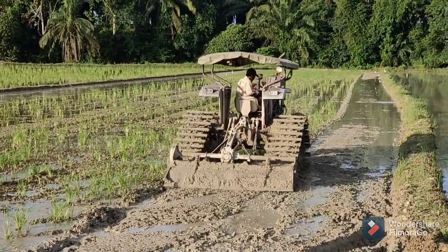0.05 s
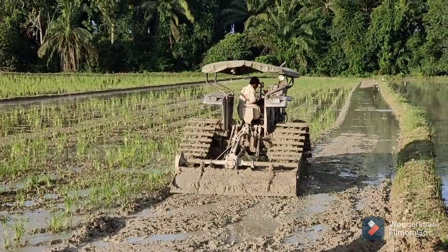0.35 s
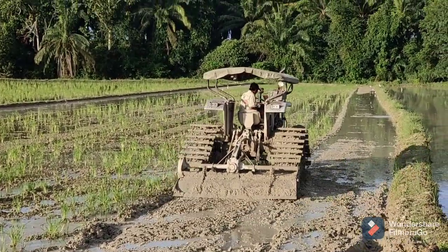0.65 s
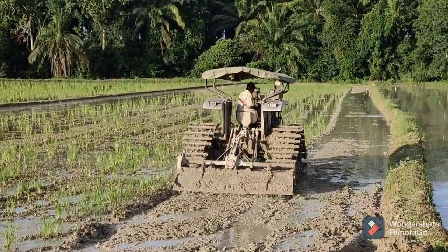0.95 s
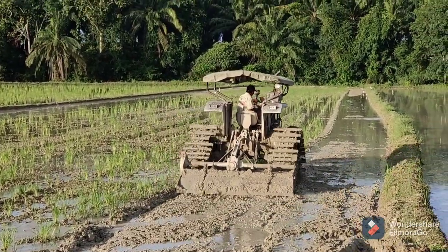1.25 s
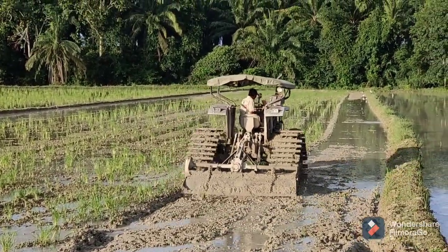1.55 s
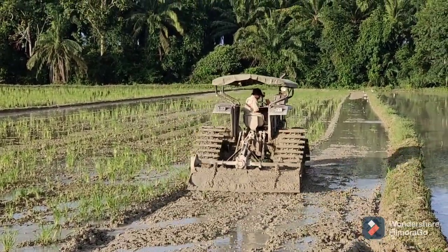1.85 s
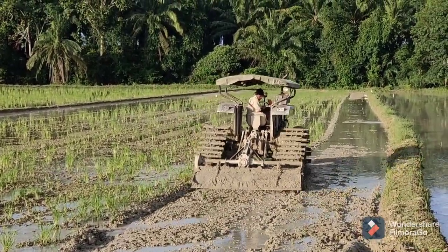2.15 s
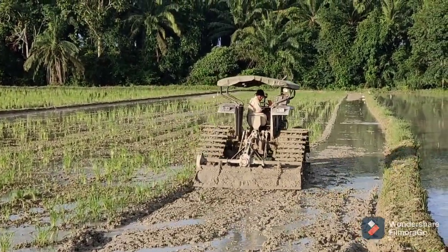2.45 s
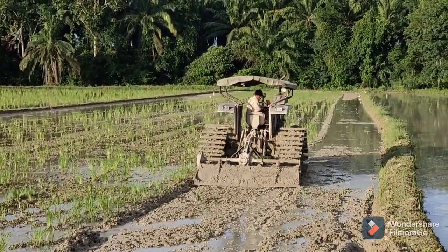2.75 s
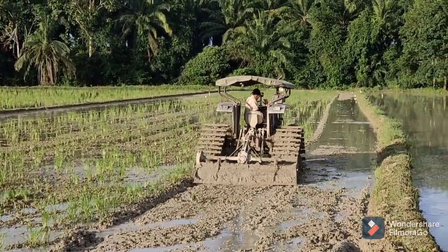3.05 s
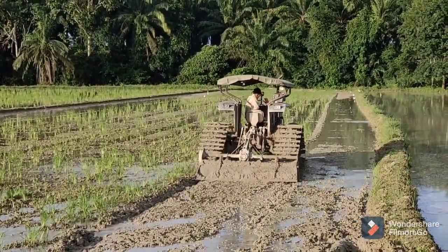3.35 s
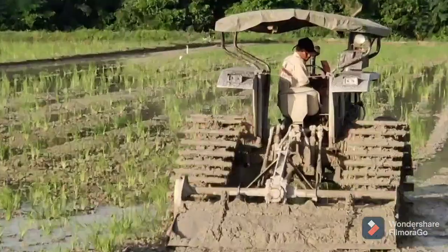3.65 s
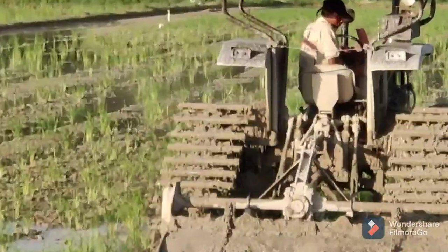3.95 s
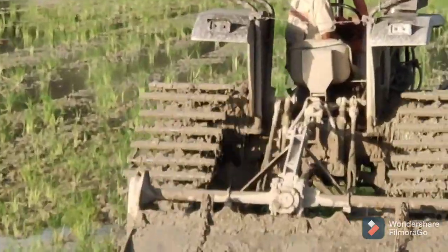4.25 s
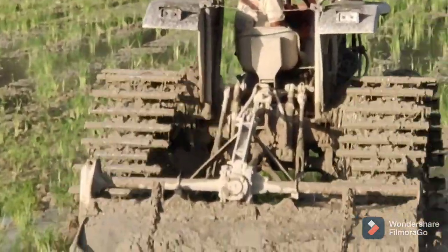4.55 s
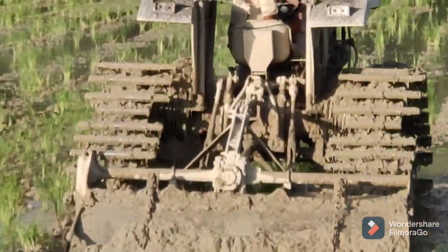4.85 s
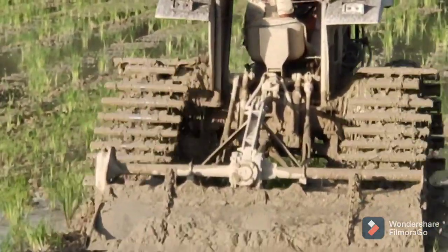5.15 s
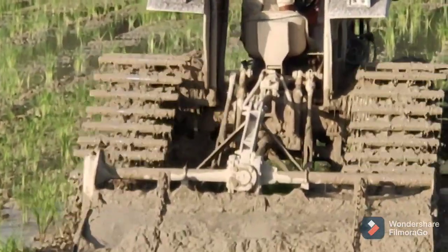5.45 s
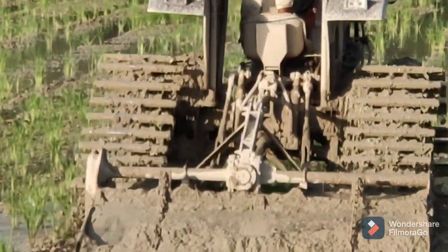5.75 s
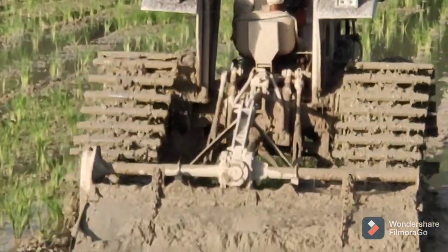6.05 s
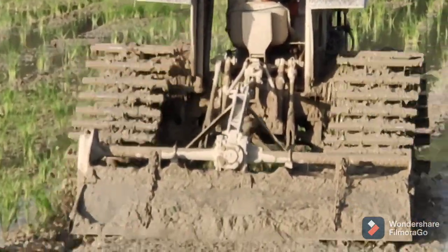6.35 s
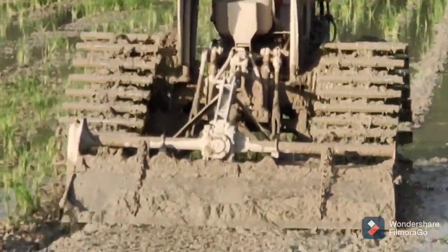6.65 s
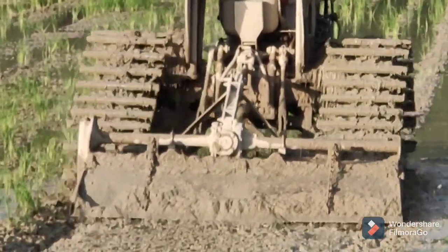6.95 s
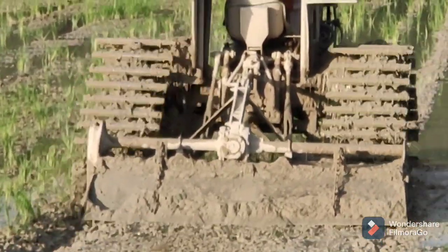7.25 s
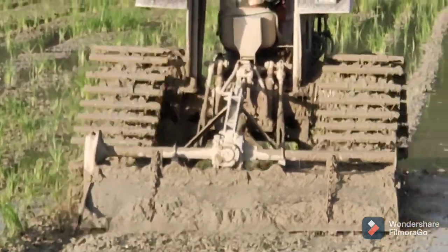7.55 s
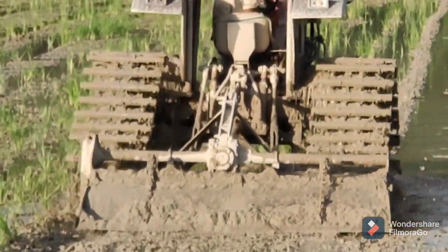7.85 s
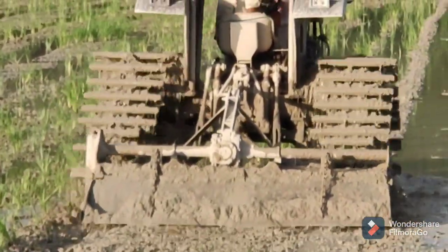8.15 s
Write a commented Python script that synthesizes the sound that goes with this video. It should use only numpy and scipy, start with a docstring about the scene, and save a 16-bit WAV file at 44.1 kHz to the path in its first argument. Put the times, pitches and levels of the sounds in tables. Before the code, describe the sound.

Outdoors in a flooded field, a small diesel tractor clatters steadily straight ahead of the microphone, pulling a tiller that churns and spatters wet mud. Its metal tracks rattle and clank unevenly, joined by occasional light clinks, a thin gear whine and a hollow exhaust drone. The engine holds its speed throughout, labouring and easing a little, and fades gently as the machine moves off.

```python
"""A small crawler tractor's four-cylinder diesel knocks 56 times a second over a hollow exhaust drone.
Each firing shakes the block, injectors and valve gear, each cylinder with its own weight and ring.
The tractor draws away through a flooded paddy field, its rotary tiller churning mud under a steel hood.
Track shoes clank on the ground and meshing gears whine, with short metallic clinks and faint air noise."""
import sys
import numpy as np
from scipy import signal
from scipy.fft import rfft, irfft, next_fast_len
from scipy.io import wavfile
from scipy.ndimage import uniform_filter1d

SR = 44100
rng = np.random.default_rng(int(sys.argv[2]) if len(sys.argv) > 2 else 0)


def store_pcm(level_fs):
    """Save levels as 16-bit WAV."""
    pcm = np.round(np.clip(level_fs, -1, 1) * 32767).astype(np.int16)
    wavfile.write(sys.argv[1], SR, np.atleast_2d(pcm).T)


N = 362061
TIME_S = np.arange(N) / SR
FFT_SIZE = next_fast_len(N + 8192)
HZ = np.maximum(np.arange(FFT_SIZE // 2 + 1) * SR / FFT_SIZE, 1)
CENTRE = np.array([[1], [0]])   # mid and side weights, straight ahead

# Governed engine speed. Each row: time in seconds, firings per second.
FIRING_RATE = [(0.0, 55.61), (0.45, 56.29), (0.64, 54.98), (1.06, 56.79), (1.68, 55.74), (2.37, 56.42),
               (2.87, 56.11), (4.11, 55.3), (4.35, 56.22), (5.72, 55.59), (5.89, 56.14), (6.23, 54.94),
               (6.55, 56.33), (7.17, 56.36), (7.47, 55.32), (7.75, 56.02), (8.2, 54.66)]
# Each row: one cylinder's block, tap, knock, ring and tick levels in dB, burst half length in seconds.
CYLINDERS = [(3, 0, 8.5, -4, -1, 0.0012), (-0.5, -4, -1.5, -5.5, -14, .0015), (2, -2, 7.5, 3, -9, 0.0011),
             (3.5, -2, 8, 3, -9, 0.0012)]
# Harder firings. Each row: time in seconds, extra knock in dB.
HARD_KNOCKS = [(0.47, 4), (0.49, 2), (0.74, 8), (0.92, 2), (1.19, 5.5), (2.13, 7), (2.83, 4), (3.36, 4),
               (3.72, 5.5), (4.01, 6.5), (4.4, 3.5), (4.76, 7), (5.41, 6), (6.09, 5.5), (6.41, 6),
               (6.48, 6.5), (6.77, 4), (7.36, 6), (8.15, 6)]
# Injector ring at even load. Each row: time in seconds, level in dB.
RING_LEVEL = [(0, -44.5), (1.1, -44), (1.6, -52.5), (2.8, -51.5), (4.0, -60), (4.42, -46.5), (5.35, -46.5),
              (5.7, -49), (8.2, -49)]
# Engine resonances. Each row: centre in Hz, width in Hz, gain in dB.
BLOCK_MODES = [(750, 560, -3.5), (1300, 89, 0), (1439, 85, 3.5), (1546, 73, -3), (1750, 117, 0),
               (2048, 170, 1.5), (2135, 140, -0.5), (2346, 96, -5), (2794, 90, -4), (3000, 200, -9)]
TAP_MODES = [(1435, 130, 6.5), (2690, 70, 6.5), (2825, 84, 5.5), (3050, 240, -1), (3300, 120, 2.5),
             (3470, 180, 2), (3610, 280, -1), (3960, 150, -2.5), (4230, 320, -2), (4540, 300, -4),
             (4950, 270, -8.5)]
RING_MODES = [(7007, 360, 3.5), (7250, 430, -18.5), (6626, 450, -3.5)]
TICK_MODES = [(11700, 1600, -9.5), (12780, 550, -5), (13600, 1500, -12)]
SIZZLE_MODES = [(15350, 1100, 0)]
# Knock spectrum. Each row: frequency in Hz, gain in dB.
KNOCK_SPECTRUM = [(2500, -15), (4000, -10), (5400, -12.5), (6400, -7), (7600, 0.5), (8200, 1.5), (8900, -6),
                  (9500, -9), (10400, -17), (13000, -22), (16000, -32)]
# Each part: base level in dB, factor on distance loss, factor on load swing.
BLOCK, TAPS, KNOCKS = (-37.5, 1.2, .35), (-49, .56, .4), (-47, 1.2, .69)
TICKS, SIZZLE = (-61.5, -.4, 1.2), (-59.5, 3.1, .6)


def diesel(crank, rate, uneven_db=2.5, grain_db=1.5, lead_firings=.07):
    """Each firing shakes the block and sets off tiny impacts in the injectors and valve gear."""
    block_cyl, tap_cyl, knock_cyl, ring_cyl, tick_cyl, half_s = np.transpose(CYLINDERS)
    even_ring_db = over_time(RING_LEVEL)
    ring_db = even_ring_db + .51 * over_time(LOAD)
    tick_db = level_db(TICKS) + .33 * (even_ring_db - even_ring_db[0])
    crank = crank + lead_firings   # impacts lead the peak of their ringing
    firing_db = uneven_db * rng.standard_normal(int(crank[-1]) + 2)
    for s, extra_db in HARD_KNOCKS:
        firing_db[round(np.interp(s, TIME_S, crank))] = extra_db
    grains = from_db(grain_db * drift(2500))
    firing = np.round(crank).astype(int)
    cylinder = firing % len(CYLINDERS)
    offset_s = (crank - firing) / rate

    def bursts(cylinder_db, decay_s, stretch=1, uneven_share=1):
        """Unit-rms envelope: a bell-shaped pulse and a tail per firing."""
        strength = from_db(cylinder_db[cylinder] + uneven_share * firing_db[firing])
        pulse = np.exp(-.5 * (offset_s / (stretch * half_s[cylinder])) ** 2)
        return unit_rms(np.sqrt(die_away(strength ** 2 * pulse, decay_s)))

    block = bursts(block_cyl, decay_s=.0049, uneven_share=.5) * cycle_noise(crank, repeat=.16)
    tap = bursts(tap_cyl, decay_s=.0034, stretch=2, uneven_share=.5) * cycle_noise(crank, repeat=.2)
    knock = bursts(knock_cyl, decay_s=.00097) * grains * cycle_noise(crank, repeat=.14)
    ring = bursts(ring_cyl, decay_s=.0016) * cycle_noise(crank, repeat=.48)
    tick = bursts(tick_cyl, decay_s=.0014, stretch=.55) * pair_noise()
    sizzle = bursts(knock_cyl, decay_s=.006, uneven_share=.5) * pair_noise()
    return (from_db(level_db(BLOCK)) * colour(block, resonances(BLOCK_MODES))
            + from_db(level_db(TAPS)) * colour(tap, resonances(TAP_MODES))
            + from_db(level_db(KNOCKS)) * colour(knock, spectrum(KNOCK_SPECTRUM))
            + from_db(ring_db) * colour(ring, resonances(RING_MODES))
            + from_db(tick_db) * colour(tick, resonances(TICK_MODES))
            + from_db(level_db(SIZZLE)) * colour(sizzle, resonances(SIZZLE_MODES)))


# Ringing steel. Each row: frequency in Hz, T60 in seconds, level in dB re the taps.
PING_MODES = [(2825, .07, 1), (3310, 0.031, 2.5), (3483, 0.037, 5.5), (3980, 0.037, -1.5)]


def valve_pings(crank, uneven_db=3.5):
    """Once a cycle the first cylinder's valve tap strikes each steel mode with a random strength."""
    at = np.flatnonzero(np.diff(crank // len(CYLINDERS)))
    tap_db = level_db(TAPS)[at]
    out = np.zeros(N)
    for hz, t60_s, db in PING_MODES:
        taps = np.zeros(N)
        taps[at] = from_db(tap_db + db + uneven_db * rng.standard_normal(len(at)))
        radius = np.exp(-np.log(1000) / (t60_s * SR))
        angle = 2 * np.pi * hz / SR
        poles = [1, -2 * radius * np.cos(angle), radius ** 2]
        out += signal.lfilter([0, np.sin(angle)], poles, taps + 1e-18)
    return out


# Drone swell. Each row: time in seconds, level in dB.
DRONE_LEVEL = [(0.0, -36), (0.4, -35.5), (0.52, -32), (1.07, -37.3), (1.75, -36.6), (2.3, -41.5),
               (2.45, -37), (3.02, -39.2), (3.38, -35.7), (3.81, -40), (3.98, -35.7), (4.56, -39.7),
               (4.66, -34.2), (4.81, -39), (5.18, -34.5), (5.26, -39.2), (5.96, -35), (6.69, -41.5),
               (6.8, -38.5), (7.45, -38.5), (7.56, -36.7), (8.2, -36.2)]
# Exhaust and steelwork resonances. Each row: centre in Hz, width in Hz, gain in dB.
DRONE_MODES = [(239, 6.5, -23.5), (308.8, 30.8, 1.5), (343.2, 35, 0.5), (379.5, 38, -3.5)]


def exhaust_drone(crank, steadiness=.36):
    """The exhaust and hollow steelwork boom roughly in a few low resonances, swelling and sinking."""
    boom = colour(cycle_noise(crank, repeat=.14), resonances(DRONE_MODES))
    swell = np.sqrt(uniform_filter1d(np.mean(boom ** 2, axis=0), size=8000))
    steadied = unit_rms(boom / swell ** steadiness)
    return low_cut(from_db(over_time(DRONE_LEVEL)) * steadied, hz=225)


# Tiller resonances. Each row: centre in Hz, width in Hz, gain in dB.
TILLER_MODES = [(483.4, 71, 0), (591, 135, -0.5), (665, 75, -3), (748, 97, 2.5), (880, 125, -3.5),
                (1107, 230, -8.5), (1326, 120, -4.5), (1449, 67, -2), (1610, 155, -5), (2170, 350, -9)]
# Wet spatter. Each row: frequency in Hz, gain in dB.
SPLASH_SPECTRUM = [(300, -1), (1000, -8), (2200, -5.5), (2550, -2.5), (3400, -7), (4500, -13), (5500, -17),
                   (7200, -8), (8300, -12.5), (10500, -21), (13000, -21.5), (15800, -28)]
CHURN = (-34, .94, .065)   # base level in dB, factor on distance loss, factor on load swing


def tiller(crank, churn_db, lumps_db=.78, spatter_db=1.5, splash_db=-8.5):
    """Tines churn mud under the steel hood and throw a fine wet spatter."""
    mud = cycle_noise(crank, repeat=.16) * from_db(lumps_db * drift(70))
    spatter = pair_noise() * from_db(spatter_db * drift(600))
    churn = colour(mud, resonances(TILLER_MODES))
    splash = colour(spatter, spectrum(SPLASH_SPECTRUM))
    return from_db(churn_db) * (churn + from_db(splash_db) * splash)


# Hard shoe slaps. Each row: start in seconds, strength in dB.
CLANKS = [(0.058, -16), (0.174, -18), (0.304, -18.5), (0.435, -20.5), (0.683, -16.5), (1.052, -18),
          (1.073, -23), (1.188, -17.5), (1.297, -19.5), (1.434, -21.5), (1.556, -19), (1.681, -18.5),
          (2.082, -25), (3.147, -25), (3.436, -21), (3.575, -21), (3.791, -19), (3.939, -21), (4.152, -22),
          (4.699, -20.5), (5.205, -22), (7.35, -28), (7.728, -19.5), (8.098, -21)]
# Steel track resonances. Each row: centre in Hz, width in Hz, gain in dB.
TRACK_MODES = [(446, 540, -1.5), (750, 210, 3), (985, 320, -2.5), (1370, 210, 0.5), (1600, 160, -3),
               (2300, 620, -16.5)]


def tracks(churn_db, shoe_hz=7.95, decay_s=.0074, rise_s=.00065, crack_db=-10.5, rattle_db=-7.5):
    """Shoes meet the ground with a crack and a short rattle, most softly, some hard."""
    beats_s = np.arange(.06, N / SR, 1 / shoe_hz)
    beats_s += rng.normal(0, .0118, len(beats_s))
    at = np.clip(beats_s * SR, 0, N - 1).astype(int)
    blows = np.zeros(N)
    blows[at] = from_db(churn_db[at] + 9 + rng.uniform(-4, 3, len(at)))
    for s, db in CLANKS:
        blows[int(s * SR)] = from_db(db)
    body = resonances(TRACK_MODES)
    crack = CENTRE * filtered(blows, body / body.mean())
    power = die_away(die_away(blows ** 2, decay_s), rise_s)
    rattle = np.sqrt(power * decay_s * SR) * colour(pair_noise(), body)
    return from_db(crack_db) * crack + from_db(rattle_db) * rattle


# Metallic clinks. Each row: start in seconds, peak in dB, pitch in Hz.
CLINKS = [(.135, -26, 2020), (.762, -27, 2030), (.868, -35, 3310), (2.611, -36, 3430), (2.93, -36, 3460),
          (3.075, -31.5, 3500), (3.573, -29, 1425), (4.151, -38, 1430), (4.44, -31, 1493),
          (4.868, -42, 3600), (5.012, -38, 3370), (5.8, -35, 3480), (6.23, -35, 4750), (6.66, -38, 3380)]


def clinks(decay_cycles=22):
    """Short metallic clinks, mostly on engine knocks; each rings on one note, high ones dying soonest."""
    out = np.zeros(N)
    age_s = TIME_S[:SR // 8]
    for s, db, hz in CLINKS:
        start = int(s * SR)
        fade = np.exp(-age_s * hz / decay_cycles)
        out[start:start + len(age_s)] += from_db(db) * fade * np.sin(2 * np.pi * hz * age_s)
    return out


# Mesh tones. Each row: multiple of the firing rate, level in dB re the churn.
GEAR_TONES = [(16, -13.5), (17, -17.5), (42, -26), (43, -27), (48, -37)]


def gears(crank, churn_db, waver_db=2.5, wobble_cycles=.04):
    """Gear teeth mesh in step with the crank; the whine wavers."""
    whine = np.zeros(N)
    for multiple, db in GEAR_TONES:
        gain = from_db(db + waver_db * drift(10))
        cycles = multiple * crank + wobble_cycles * drift(14)
        whine += gain * np.sin(2 * np.pi * cycles)
    return from_db(churn_db) * whine


# Open air. Each row: frequency in Hz, gain in dB.
AIR_SPECTRUM = [(20, 1), (60, -12.5), (140, -8.5), (200, 0), (300, -9), (2000, -15)]


def field_air():
    """Faint steady noise over the open field."""
    return from_db(-74) * colour(pair_noise(), spectrum(AIR_SPECTRUM))


# The engine labours and eases as the tines bite. Each row: time in seconds, load in dB.
LOAD = [(0.0, 2.8), (0.29, -2.5), (0.7, 3.1), (1.47, -5), (1.68, 4.5), (2.26, -2.3), (2.98, -1.5),
        (4.48, 2), (4.79, -6.5), (5.06, 3.9), (5.77, -3.1), (6.25, 6), (6.6, -0.5), (7.31, -2.5),
        (7.5, 2.1), (7.73, -1.4), (7.95, -1), (8.2, 2.6)]


def level_db(part, start_m=10, speed_m_per_s=.84):
    """A part's level over time, set by the growing distance and the load."""
    base_db, distance_factor, load_factor = part
    loss_db = 20 * np.log10(1 + speed_m_per_s * TIME_S / start_m)
    return base_db - distance_factor * loss_db + load_factor * over_time(LOAD)


# Notches. Each row: centre in Hz, width in Hz, weight in dB.
NOTCHES = [(1193, 310, -6), (2530, 335, -0.5), (5130, 180, -10), (11800, 1500, -5)]
# Each row: time in seconds, notch depth from 0 to 1.
NOTCH_DEPTH = [(0, 0.3), (2, 0.04), (4, 0.26), (5.4, 0.56), (8.2, 0.56)]


def hollowed(x):
    """The tone fills out, then grows hollow in a few bands as the tractor draws away."""
    return x - over_time(NOTCH_DEPTH) * filtered(x, resonances(NOTCHES))


def from_db(db):
    """Decibels to gain."""
    return 10 ** (np.asarray(db) / 20)


def unit_rms(x):
    """Scale to unit rms."""
    return x / np.sqrt(np.mean(x ** 2) + 1e-20)


def over_time(rows):
    """A curve's value at each sample."""
    return np.interp(TIME_S, *np.transpose(rows))


def spectrum(rows):
    """Gain from dB points joined on a log-frequency axis."""
    hz, db = np.transpose(rows)
    return from_db(np.interp(np.log(HZ), np.log(hz), db))


def resonances(modes):
    """Gain over frequency of a body with steep-sided resonances."""
    return np.sqrt(sum(from_db(db) ** 2 / (1 + (2 * (HZ - hz) / width) ** 4) for hz, width, db in modes))


def filtered(x, gain):
    """Apply a gain over frequency."""
    return irfft(rfft(x, FFT_SIZE) * gain, FFT_SIZE)[..., :N]


def colour(x, gain):
    """Filter, then scale to unit rms."""
    return unit_rms(filtered(x, gain))


def low_cut(x, hz):
    """Eighth-order high-pass."""
    return signal.sosfilt(signal.butter(8, hz, "high", fs=SR, output="sos"), x)


def drift(rate_hz):
    """Random wander with unit rms."""
    knots = rng.standard_normal(int(N / SR * rate_hz) + 2)
    return unit_rms(np.interp(TIME_S * rate_hz, np.arange(len(knots)), knots))


def die_away(power, decay_s):
    """Give each burst of power an exponential tail."""
    pole = np.exp(-1 / (decay_s * SR))
    return signal.lfilter([1 - pole], [1, -pole], power + 1e-18)


def pair_noise():
    """Independent white noise for mid and side."""
    return rng.standard_normal((2, N))


def cycle_noise(crank, repeat):
    """Noise with a share that repeats each four-stroke cycle: faint lines 14 Hz apart."""
    cycles = crank / len(CYLINDERS)
    period = int(N / (cycles[-1] - cycles[0]))
    looped = rng.standard_normal((2, period))[:, (cycles * period).astype(int) % period]
    return np.sqrt(repeat) * looped + np.sqrt(1 - repeat) * pair_noise()


# Stereo width. Each row: frequency in Hz, side gain in dB re mid.
SIDE_GAIN = [(60, -7), (130, -10), (250, -19), (600, -17), (1300, -12), (2400, -11), (4400, -8), (8000, -4),
             (15000, -2)]


def spread(mid_side):
    """Mid and side to left and right, least alike in the treble."""
    mid, side = mid_side
    side = filtered(side, spectrum(SIDE_GAIN))
    return np.array([mid + side, mid - side])


def scene():
    """Engine, tiller and gears follow one crank; tracks and air join them."""
    rate = over_time(FIRING_RATE)
    crank = np.cumsum(rate) / SR - .46   # in firings
    churn_db = level_db(CHURN)
    air = field_air()
    tones = CENTRE * (gears(crank, churn_db) + valve_pings(crank) + clinks())
    machine = hollowed(diesel(crank, rate) + tiller(crank, churn_db))
    tractor = low_cut(machine + tracks(churn_db) + tones, hz=310)   # a small machine carries little bass
    return spread(tractor + exhaust_drone(crank) + air)


# Microphone balance. Each row: frequency in Hz, left minus right in dB.
BALANCE = [(60, 0.0), (110, 0), (200, 0), (380, -0.5), (700, 1.0), (1290, 2.5), (2380, 2), (4400, 1.0),
           (8120, 1.5), (15000, 5)]


def record(dry, cutoff_hz=15850):
    """The left microphone is a little brighter; the top is cut steeply."""
    balance = spectrum(BALANCE) ** np.array([[.5], [-.5]])
    top_cut = np.clip((cutoff_hz - HZ) / 150, 0, 1)
    return filtered(dry, balance * top_cut)


dry = scene()
out = record(dry)
store_pcm(out)
```